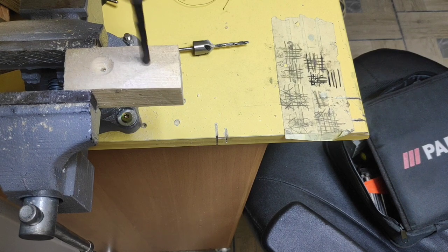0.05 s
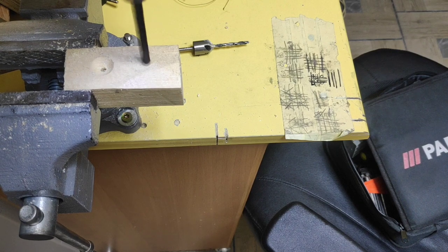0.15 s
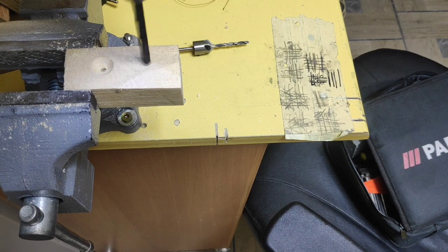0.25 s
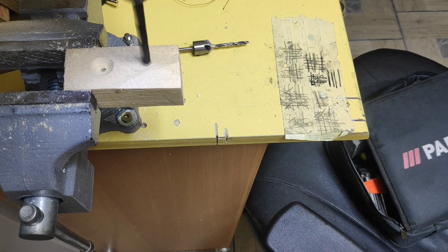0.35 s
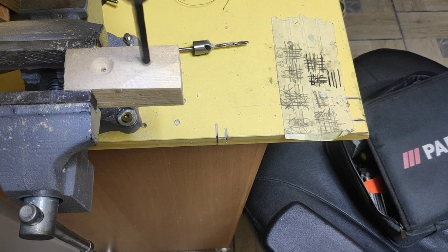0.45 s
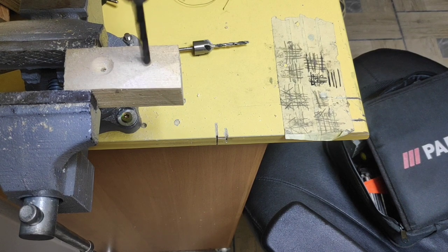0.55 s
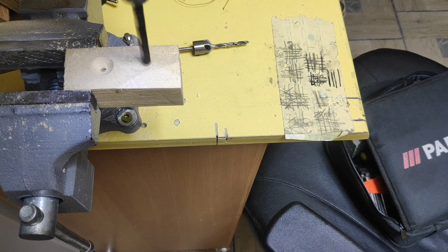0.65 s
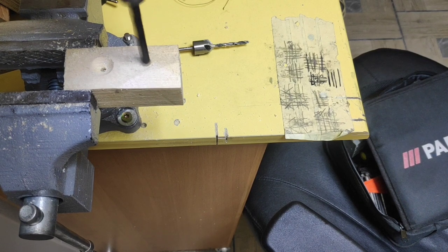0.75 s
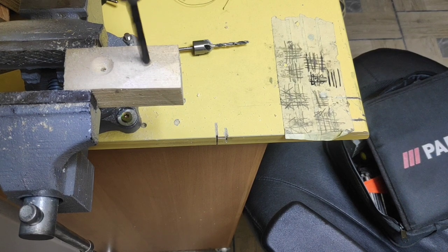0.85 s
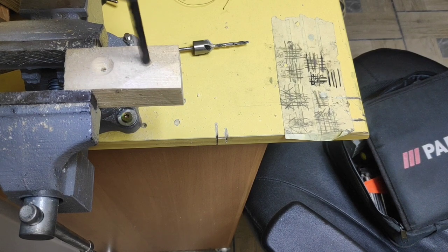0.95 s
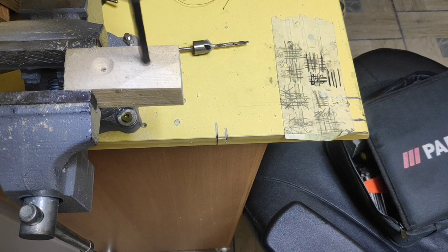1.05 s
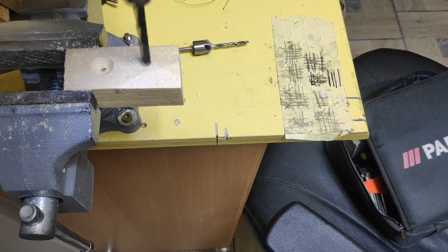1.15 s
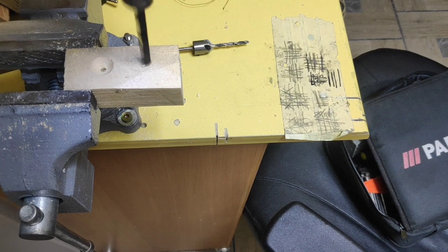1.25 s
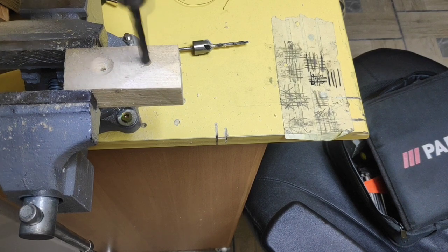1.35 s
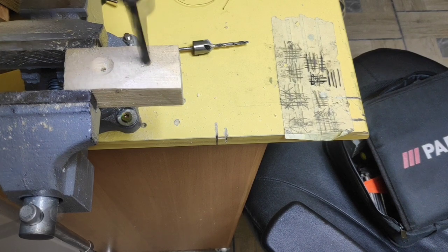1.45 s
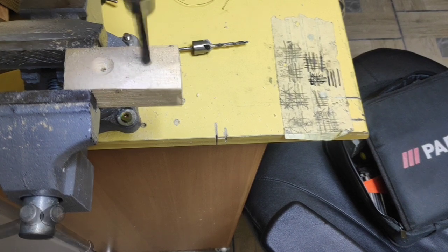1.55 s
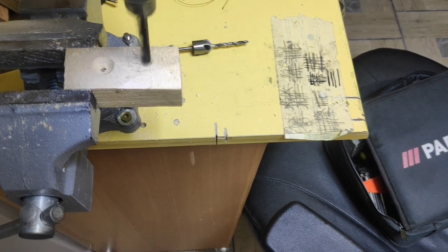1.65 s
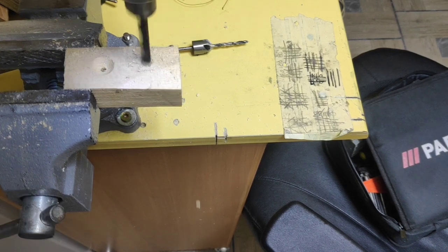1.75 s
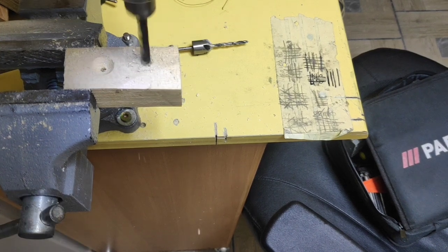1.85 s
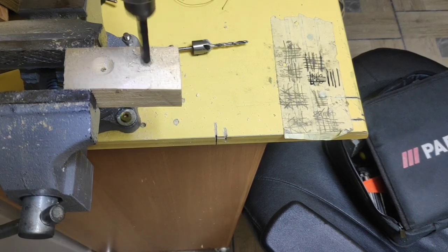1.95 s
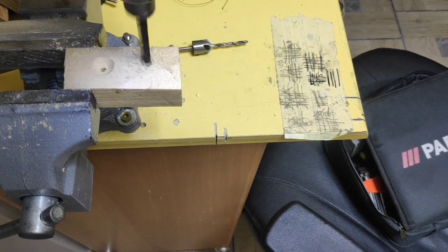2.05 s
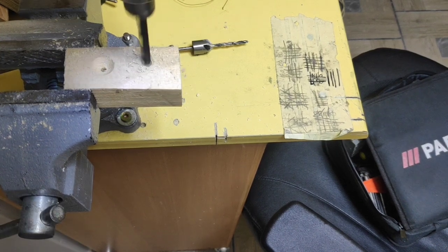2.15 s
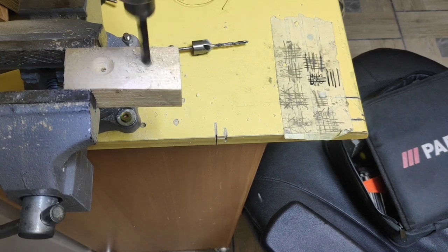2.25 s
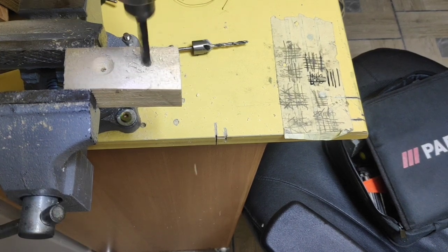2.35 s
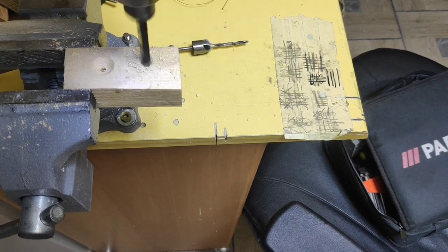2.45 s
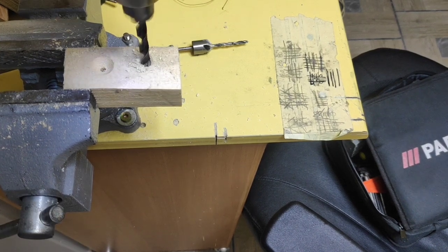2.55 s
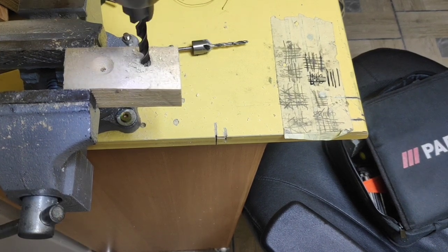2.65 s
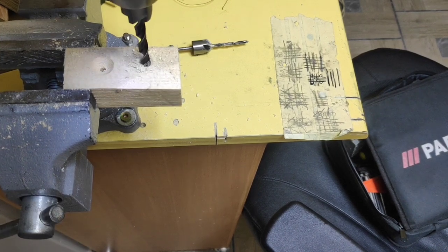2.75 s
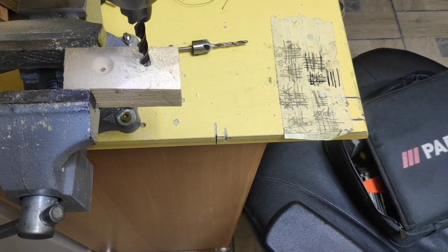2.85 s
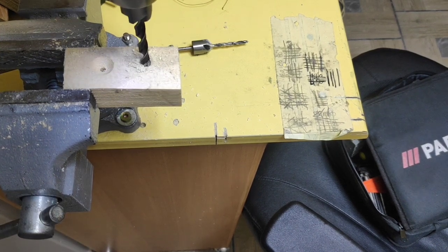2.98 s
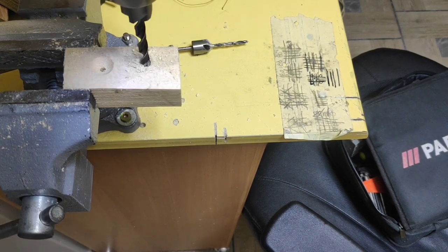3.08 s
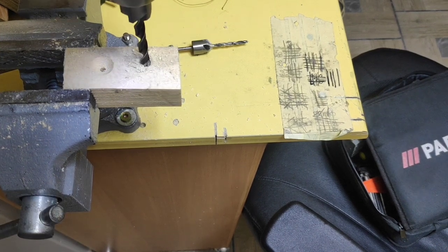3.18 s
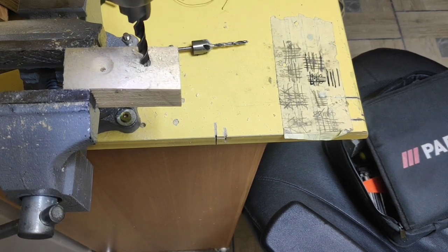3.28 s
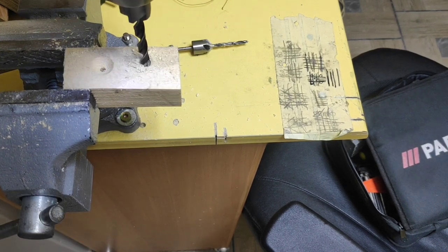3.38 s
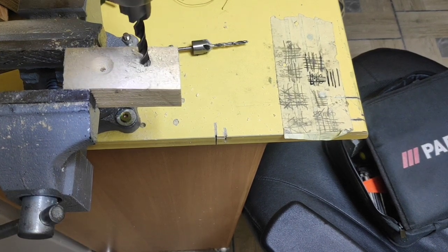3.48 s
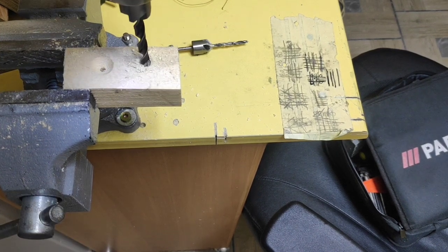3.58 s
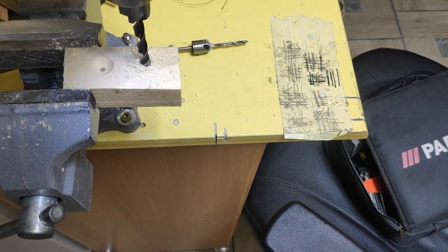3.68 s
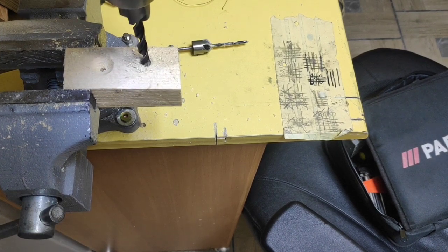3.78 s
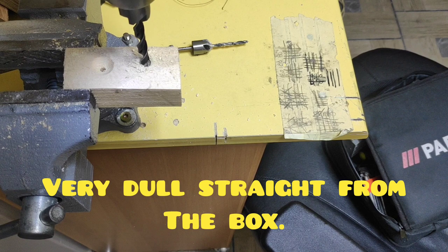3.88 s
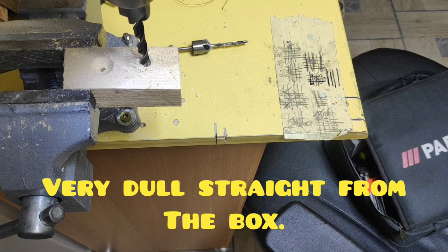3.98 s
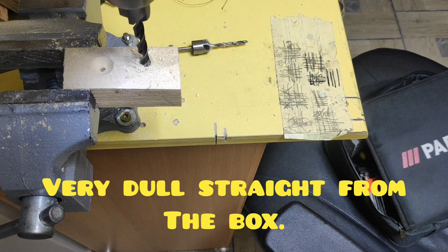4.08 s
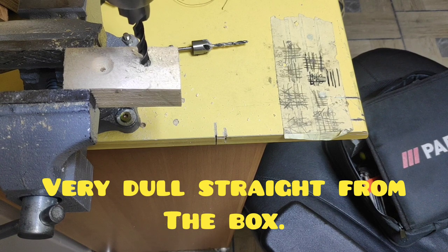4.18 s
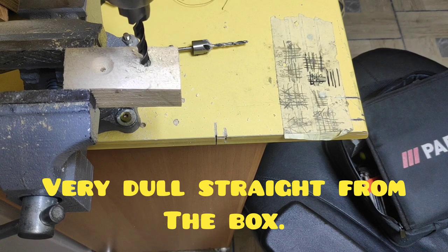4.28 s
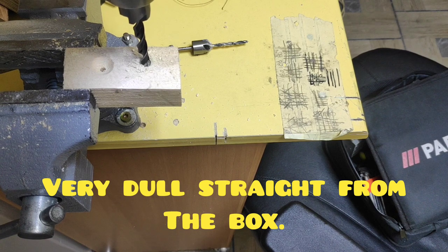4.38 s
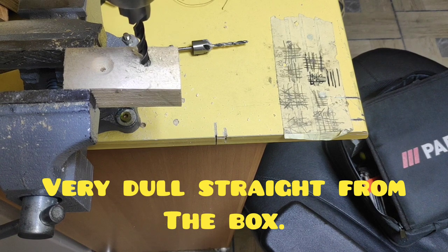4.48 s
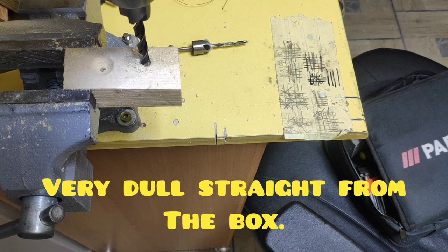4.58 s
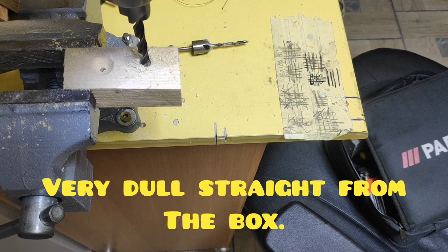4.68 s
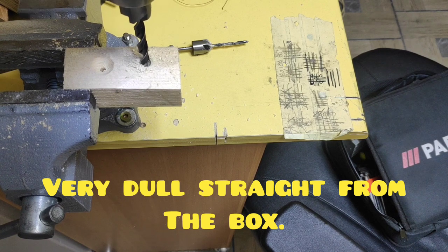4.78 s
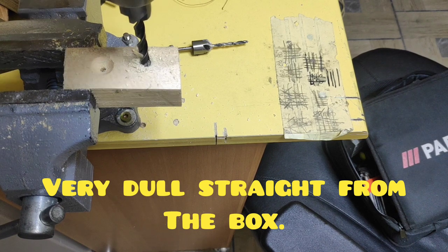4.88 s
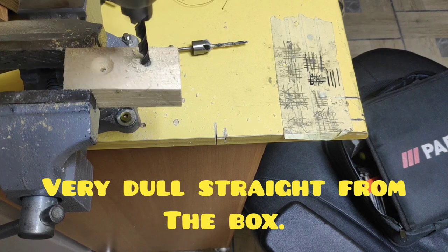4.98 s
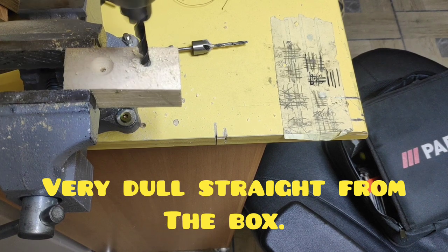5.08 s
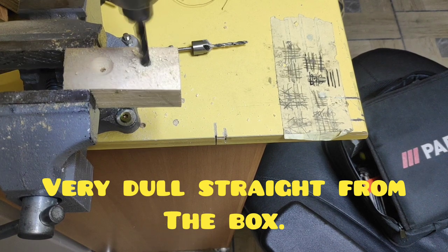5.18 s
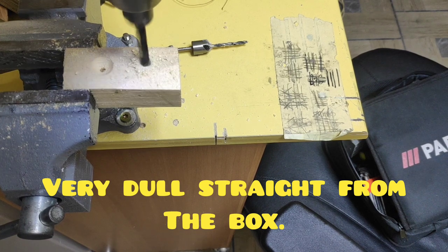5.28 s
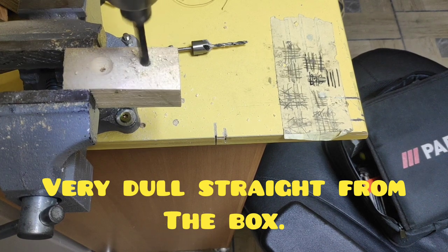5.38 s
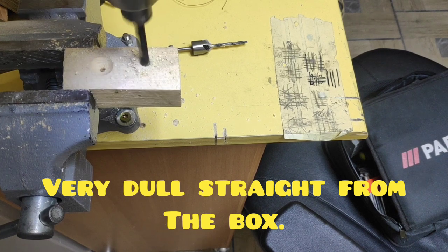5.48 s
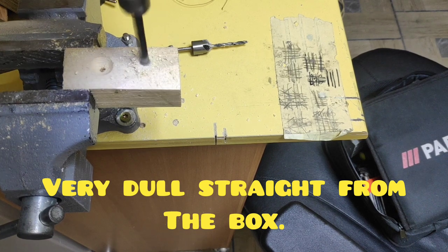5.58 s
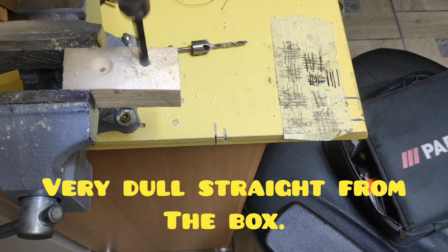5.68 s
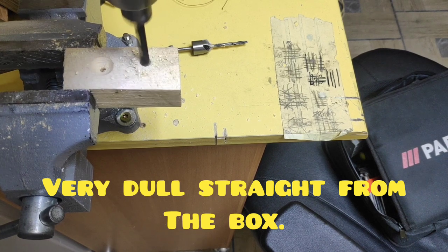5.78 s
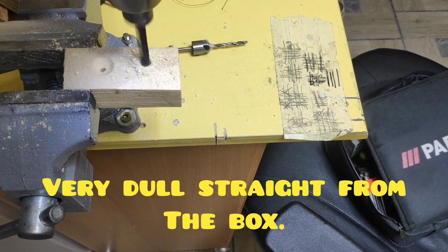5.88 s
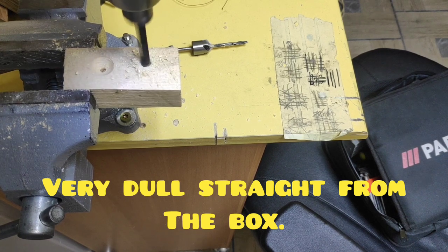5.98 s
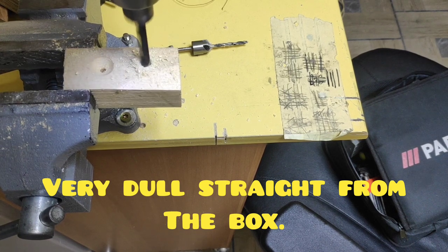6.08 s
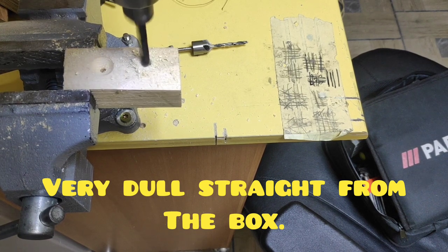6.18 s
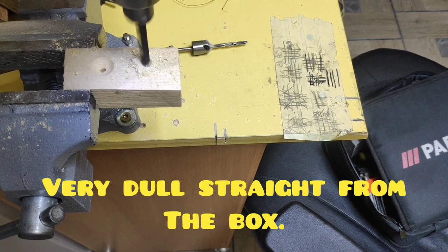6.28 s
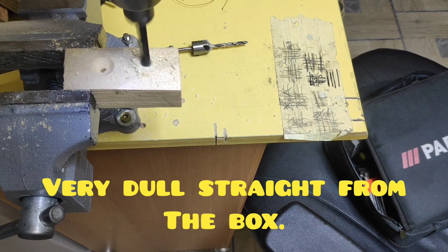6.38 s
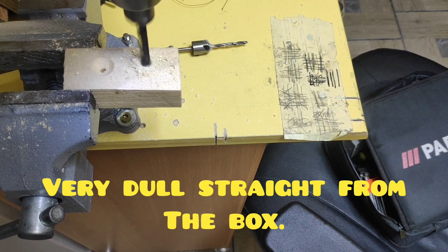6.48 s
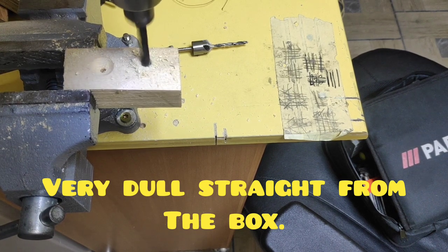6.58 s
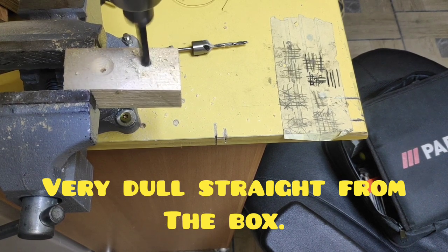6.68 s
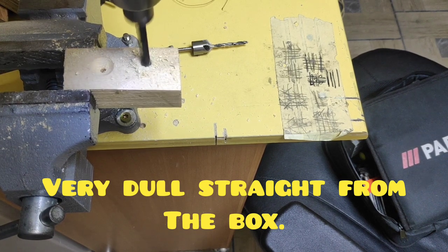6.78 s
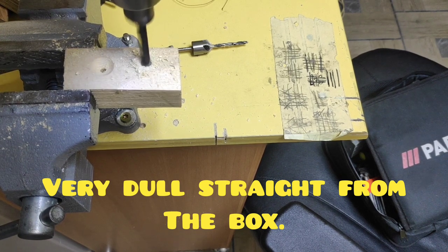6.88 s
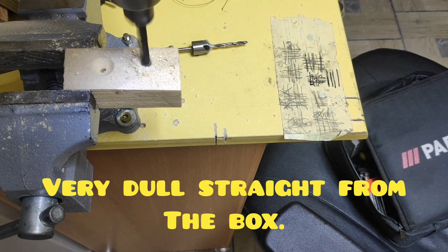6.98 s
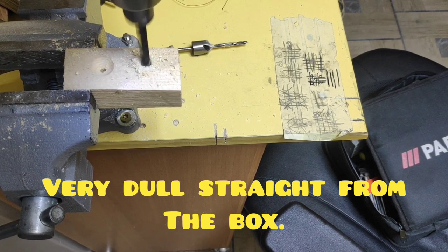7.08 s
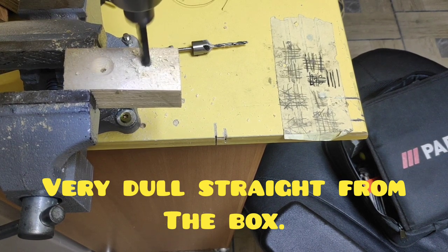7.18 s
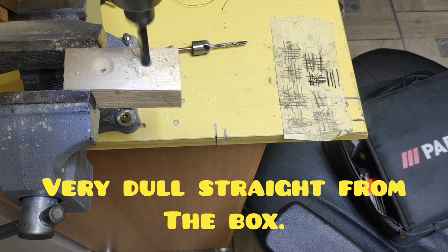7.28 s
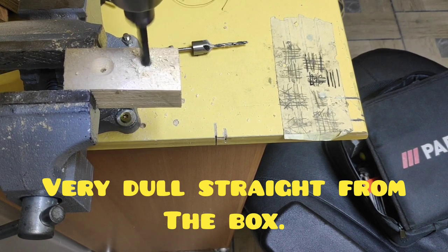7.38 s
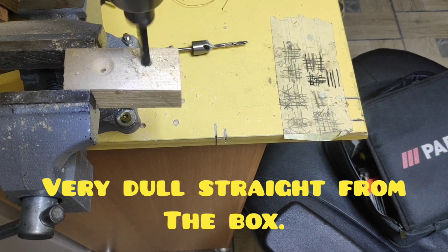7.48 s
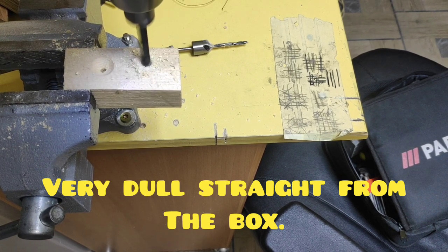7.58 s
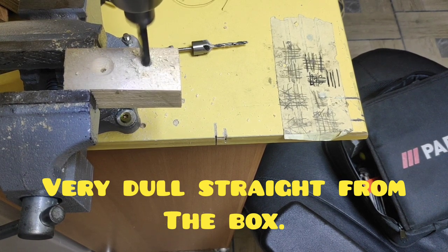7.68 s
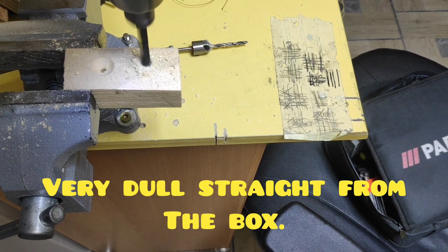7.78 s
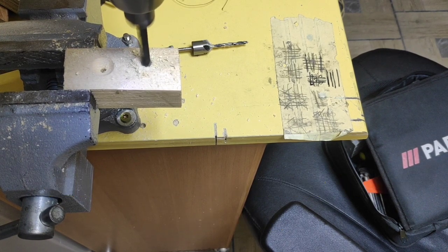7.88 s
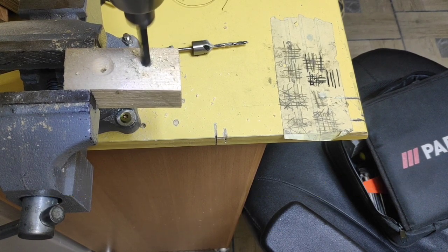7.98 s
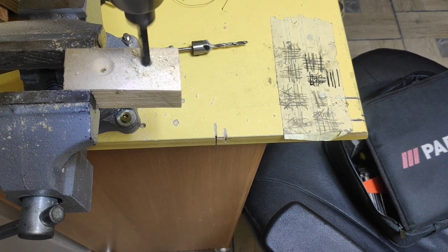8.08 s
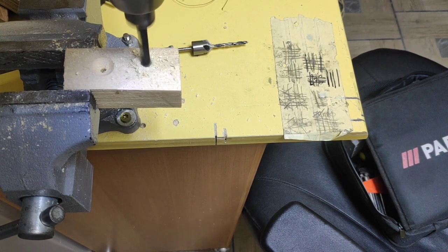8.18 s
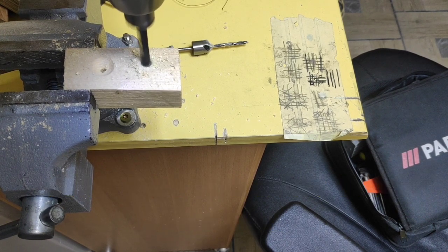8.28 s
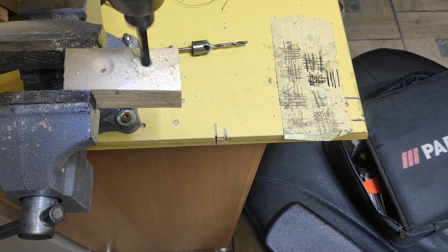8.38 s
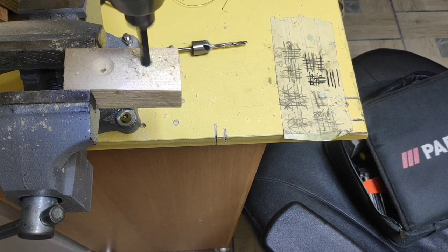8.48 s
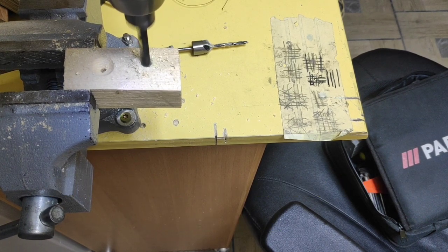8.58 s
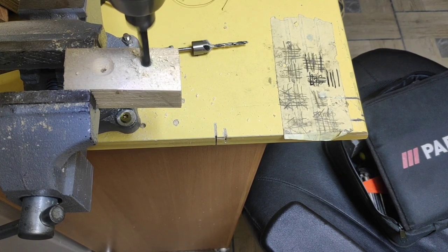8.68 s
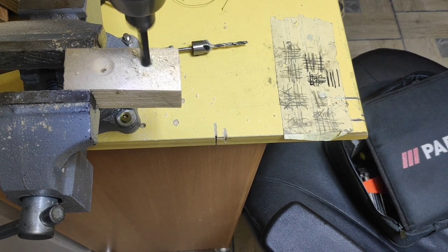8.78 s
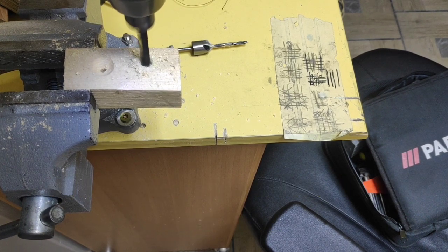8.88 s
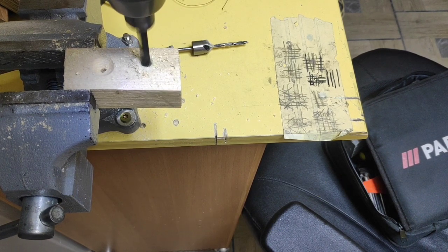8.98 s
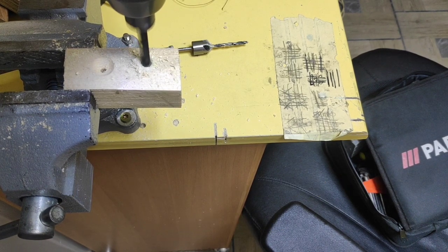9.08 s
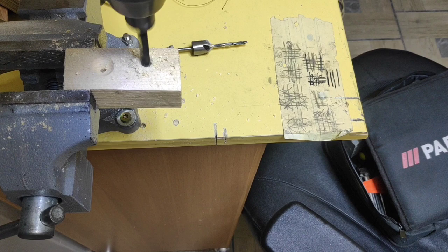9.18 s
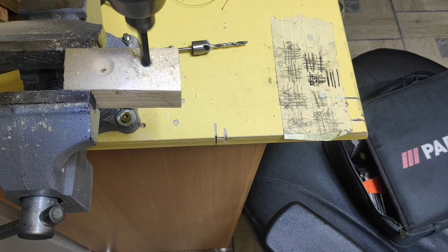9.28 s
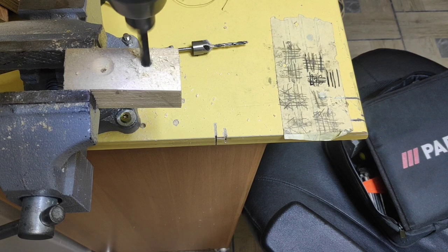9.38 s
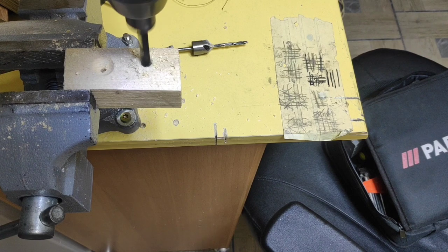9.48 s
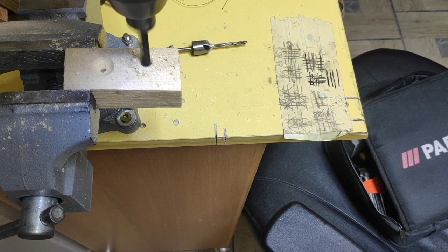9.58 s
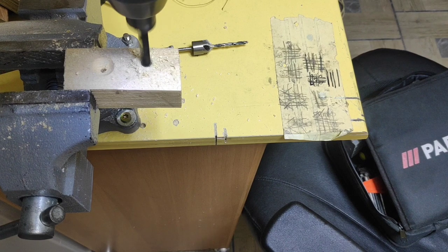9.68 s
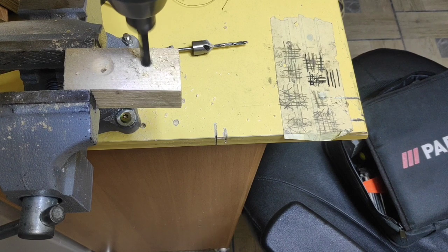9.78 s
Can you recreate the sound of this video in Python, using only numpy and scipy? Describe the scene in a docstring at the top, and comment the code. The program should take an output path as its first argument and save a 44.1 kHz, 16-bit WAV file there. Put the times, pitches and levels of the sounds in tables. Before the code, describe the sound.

Stereo, close drill sound with a short diffuse room behind it. A high-pitched electric motor and gritty gears start at once, blend into a slower run, then drop off quickly in a chattering metallic clack. Small clicks and faint rubbing follow over low room hum. Drilling then fades up already at speed, rises, sags under load and drones steadily, with a thin squeak late on and low bench rumble beneath.

```python
"""A small workshop, two microphones: a cordless drill bores into a wooden block held in a vice, in three runs.
The first spins up, its motor and gear tones whining over a dense gear rattle, and fades into a slower second.
When the trigger is let go the motor slows and the spindle brake clunks; light ticks, bumps and rubs follow.
The third run swells in, already at speed; its pitch and drone move with the load, and a faint squeak comes late.
Tones follow the motor's turns and swell in the drill's resonances; noise makes the rattle, room air and touches."""
import sys
import numpy as np
from scipy import signal
from scipy.fft import rfft, irfft, next_fast_len
from scipy.io import wavfile
from scipy.ndimage import uniform_filter1d

SR = 44100
rng = np.random.default_rng(int(sys.argv[2]) if len(sys.argv) > 2 else 0)


def to_wav(s):
    """Save 16-bit WAV."""
    ch = np.atleast_2d(s).T  # columns
    pcm = np.round(np.clip(ch, -1, 1) * 32767)  # PCM
    wavfile.write(sys.argv[1], SR, pcm.astype(np.int16))


N = 433944
TIME = np.arange(N) / SR

# motor speed under the changing load, one curve a run: (time [s], speed [turns per s])
FIRST_RUN_SPEED = [(.2, 403.5), (.67, 401.5), (.94, 403.5), (1.24, 397.5), (1.43, 401.5), (1.9, 398)]
SECOND_RUN_SPEED = [(1.3, 378), (1.6, 379.5), (1.78, 376), (2.0, 381.5), (2.14, 383.4), (2.4, 382.3),
                    (2.5, 388)]
THIRD_RUN_SPEED = [(4.6, 384), (5.15, 386), (5.27, 401), (5.5, 407.5), (5.73, 410), (5.96, 401),
                   (6.22, 394), (6.39, 386), (6.7, 391.7), (6.94, 391.4), (7.05, 389.2), (8.16, 387.3),
                   (8.27, 376.5), (8.55, 382), (8.68, 375.5), (8.92, 376.5), (9.2, 382.5), (9.48, 377.5),
                   (9.8, 381)]
FULL_SPEED = 397.6   # reference speed, turns per s
# the motor starts at this share of its speed and closes the gap with this time constant
START_SHARE, SPIN_UP_S = .27, .04
# the trigger is let go, the motor slows ever faster over this long, and the brake cuts the sound
RELEASE_S, BRAKING_S, BRAKE_S = 2.525, .125, 2.602
FIRST_RUN_DB, SECOND_RUN_DB = 0.86, .5   # levels relative to the third run
DISSOLVE_FROM_S, DISSOLVE_S = 1, 1.015   # the first run fades out as the second fades in
RESTART_S, SWELL_S, SWELL_POWER = 4.597, 1.11, 0.87   # the third run swells in almost linearly

# tones of the rotating parts: (part, cycles per motor turn, level away from resonances [dB],
# left-right [dB], roughness [0-1])
TONES = [("shaft", 1, -44, -1, 0.11), ("shaft", 2, -46.5, -2, .4), ("poles", 4, -33.5, -6.5, 0.46),
         ("commutator", 8, -27, -7.5, .31), ("rotor", 10, -35, -6, 0.74), ("pinion", 13, -36, -5.5, 0.51),
         ("fan", 15, -35, -5, 0.5), ("mesh", 56 / 3, -42.5, -8.5, 0.67), ("whistle", 28, -36.5, 9, 0.41),
         ("shudder", 13 / 32, -47, 0, 0.35), ("squeak", 6.55, -35, 0, 1), ("teeth", 19 / 3, -39, 0, 1),
         ("teeth", 20 / 3, -33, 0, 1), ("teeth", 26 / 3, -36.5, -1, 1), ("teeth", 28 / 3, -31, .75, 0.71),
         ("teeth", 52 / 3, -28, -8.5, 0.53)]
# resonances of the drill: (centre [Hz], half width where the boost falls to 1/e [Hz], boost [dB])
RESONANCES = [(413.6, 33.4, 8.5), (1180, 150, 8), (3130, 220, 7.5), (3854, 22, 6.5), (4020, 87, 5),
              (4600, 290, 7), (5260, 250, 9.5), (5800, 70, 5.5), (7080, 270, 19.5), (11260, 73, 10.5)]
# added level of the commutator's whine: (time [s], level [dB])
COMMUTATOR = [(.055, -16), (.1, 1), (.45, -3), (.63, -1), (.8, -2.5), (1.8, -3.5), (2.05, -1.5),
              (2.52, -4.5), (2.56, -12.5), (4.6, -7.5), (5.1, -4.5), (5.22, -1), (5.38, -8), (5.53, 2.5),
              (5.88, -4), (6.2, 1), (6.42, -4), (6.6, 0.5), (8.2, -3), (8.62, -6.5), (8.74, -2),
              (9.3, -6.5), (9.4, -6.5), (9.65, -7.5)]
# added level of the lower tone of the poles: (time [s], level [dB])
POLES = [(0, -10), (.04, 8), (.08, -4), (.3, -0.5), (1.1, -1), (1.5, -11), (2.54, -9), (2.57, 9),
         (2.587, 15.5), (2.605, -13), (4.6, 3), (5.1, 0), (5.55, 3), (5.75, -3), (6.3, 4), (6.42, 0),
         (6.65, 4.5), (6.93, 8.5), (7.15, -1), (7.35, 4.5), (7.6, -4), (8.0, 4), (8.25, -1.5), (9.8, -5)]
# added level of the low shudder of the bit in its hole: (time [s], level [dB])
SHUDDER = [(.15, -17), (.45, 1), (.75, -4), (2.5, -4.5), (5.75, -11), (5.95, 4), (6.12, 5), (6.24, -7),
           (6.65, 5), (6.95, -1), (7.12, -7), (7.3, 3), (7.9, -5.5), (9.8, -3)]
# added level of a faint squeak of the bit, once it is deep in the hole: (time [s], level [dB])
SQUEAK = [(8.25, -18), (8.4, 8), (9.8, 2.5)]
# added level of the pinion's tone, strongest while the motor gathers speed: (time [s], level [dB])
PINION = [(.03, 11.5), (.07, 9), (.12, 7), (.2, -0.5), (8.1, -1), (8.4, -6)]
SINGING = {"commutator": COMMUTATOR, "pinion": PINION, "poles": POLES, "shudder": SHUDDER, "squeak": SQUEAK}
TONE_FOLLOWS = 1.14   # all tones but the shaft's swing further in dB than the rattle
TEETH_FOLLOW = .25    # side tones of the teeth grow with load: share of the pressure's swing in dB
BREAK_UP = 1.5        # the weakening commutator whine breaks up: dB of roughness gained per dB lost

# how hard the bit bears down on the block: (time [s], level [dB])
BEARING = [(0, -14), (1.4, -18), (2.1, -9), (4.6, -1.5), (9.84, -1.5)]
# colours of the rattle through housing, gearbox and block, and of its hiss:
# (frequency [Hz], relative level per Hz [dB])
HOUSING = [(60, -32.5), (165, -7.5), (280, -16), (480, -10), (760, -4.5), (1130, 2.5), (1850, -3.5),
           (2500, -2), (2850, -7.5), (3600, -20)]
GEARBOX = [(2400, -47.5), (2950, -10.5), (3450, -8), (4050, -1.5), (4800, -4.5), (6200, -1), (7200, -0.5),
           (7800, -2.5), (8300, -6), (9400, -7.5), (11000, -33)]
BLOCK = [(450, -32), (620, -7.5), (790, 1.5), (900, 1), (1080, -13.5), (1500, -31.5)]
HISS = [(7500, -25.5), (9300, -6.5), (10300, 5), (11200, 7), (12500, 3.5), (13600, 5), (14300, -12),
        (14700, -35)]
# steel ring of the chuck: (frequency [Hz], relative level per Hz [dB])
CHUCK = [(6000, -38.5), (6750, -9.5), (7100, 1.5), (7400, -11.5), (8200, -42)]
# the bit's flutes scrape in the hole: (frequency [Hz], relative level per Hz [dB])
SCRAPE = [(6000, -32), (7600, 6.5), (8700, 3), (10000, 0.5), (11000, -26)]
# balance of the rattle's paths, before drone, mesh and pressure act on them
GEARBOX_DB, HISS_DB, HOUSING_DB = -18.5, -21, -30
BLOCK_DB, CHUCK_DB, SCRAPE_DB = -32.5, -42.5, -22
DRONE_DB_PER_HZ = 0.1254   # housing and block drone more as the motor runs faster
# the rattle drops briefly: (time [s], length either side [s], level [dB])
LULLS = [(1.206, 0.0095, -7), (2.536, 0.0052, -3.5)]

# blows of the brake: (time [s], level [dB])
CLACKS = [(2.540, -24), (2.575, -21), (2.58, -6.5), (2.585, -8.5), (2.605, -19)]
# broad resonances that each blow rings: (centre [Hz], added level [dB], burst decay t60 [s])
CLACK_MODES = [(1180, -8.5, 0.03), (2500, -5.5, 0.02), (3850, -9.5, .02), (6050, -2.5, 0.025)]
# light ticks: (time [s], peak level [dB], centre [Hz], burst decay t60 [s])
TICKS = [(2.8765, -29, 3700, 0.014), (2.886, -46, 6000, .012), (3.2085, -25, 7000, 0.014),
         (3.2105, -28, 5160, 0.027), (3.388, -41, 6000, .01), (3.3905, -30.5, 3500, 0.014),
         (3.402, -45, 3400, .14)]
# dull bumps of the bench: (time [s], starting level [dB], frequency [Hz], decay t60 [s])
BUMPS = [(2.825, -47, 125, 0.073), (2.882, -42, 110, 0.052), (3.703, -52, 121, .07),
         (5.7705, -28, 105, .07), (5.79, -35, 126, .12), (5.828, -42, 125, .1)]
# handling rubs: (time [s], length either side [s], level [dB])
RUBS = [(3.066, 0.017, -54), (3.864, .011, -47), (3.902, 0.016, -43), (4.365, 0.033, -55),
        (4.445, 0.045, -51.5)]
# colour of the rubs: (frequency [Hz], relative level per Hz [dB])
RUB = [(1470, -47), (2500, -17), (4580, -9), (5070, -8), (7010, -2), (10100, -11), (14000, -8.5)]

# colour of the bench's rumble: (frequency [Hz], relative level per Hz [dB])
RUMBLE = [(15, -8.5), (40, 5.5), (70, -6), (110, -8.5), (230, -4), (400, -43.5)]
BENCH_DB, BENCH_FOLLOWS = -50, 0.59   # level at 0 dB pressure; share of the pressure's swing in dB
# the drill at the two microphones: (frequency [Hz], left-right [dB], likeness [0-1], left lag [radians])
MICS = [(40, 0.5, 0.2, 0.5), (150, -1, 0.9, 0.34), (428.5, 3, 0.77, 0.2), (776, -4.5, 0.5, 1),
        (1210, -1.5, 0.63, 1.33), (1960, -2, 0.6, 3.02), (2700, -0.5, 1, 2.77), (3960, -1, .45, 5.64),
        (4700, -2.5, 0.7, 6.1), (5680, -6, 0.15, 7.14), (7200, -4, 0.38, 6.95), (8640, -1, 0.29, 8.8),
        (10390, 7.5, 0.13, 6.7), (13500, 9, 0.05, 7.9)]
# workshop reverberation: (frequency [Hz], decay t60 [s])
ROOM_T60 = [(150, 0.32), (1100, 0.58), (4000, 0.5), (8000, 0.38), (14000, 0.39)]
# colour of the room's steady air: (frequency [Hz], relative level per Hz [dB])
FLOOR = [(25, 1), (50, 4.5), (100, -0.5), (580, -5), (810, -3.5), (1400, -13), (2250, -2), (2450, -13.5),
         (4900, -15), (5850, -7.5), (7000, -16), (10300, -17), (13000, -13.5)]
FLOOR_DB = -57.5
# faint mains hum in the room: (frequency [Hz], rms level [dB])
HUM = [(100, -82), (200, -74), (300, -76.5)]
CUTOFF_HZ = 14400


def from_db(db):
    """Decibels to gain."""
    return np.exp(np.asarray(db) * (np.log(10) / 20))


def rms_one(x):
    """Scale to an rms of 1."""
    return x / np.sqrt(np.mean(np.abs(x) ** 2) + 1e-20)


def in_time(rows):
    """The columns of a curve, sample by sample."""
    s, *columns = np.transpose(rows)
    return [np.interp(TIME, s, column) for column in columns]


def at_hz(rows, hz):
    """The columns of a spectrum, read on a log-frequency axis."""
    points, *columns = np.transpose(rows)
    log_hz = np.log(hz + 1)
    return [np.interp(log_hz, np.log(points), column) for column in columns]


def band_pass(order, edges, x):
    """Keep what lies between two edges in Hz."""
    return signal.sosfilt(signal.butter(order, edges, "band", fs=SR, output="sos"), x)


def drift(corner_hz):
    """Slow chance of spread 1: noise through two equal low-pass poles, drawn at every 16th sample."""
    pole = np.exp(-2 * np.pi * corner_hz * 16 / SR)
    noise = rng.standard_normal(N // 16 + 4002)
    slow = signal.lfilter([1], [1, -2 * pole, pole * pole], noise)[4000:]   # past the filter's start
    return np.interp(np.arange(N) / 16, np.arange(len(slow)), rms_one(slow))


def stereo_noise(spectrum, strength=1, aimed=1):
    """Coloured noise of rms 1, partly shared by both microphones; aimed=1 places it at the drill."""
    size = next_fast_len(N, True)
    hz = np.arange(size // 2 + 1) * SR / size
    excitation = rng.standard_normal((3, N), dtype=np.float32) * np.float32(strength)
    shared, left, right = rfft(excitation, size)
    pan_db, alike, lag = np.float32(at_hz(MICS, hz))
    alike = np.clip(alike, 0, 1)
    common, own = np.sqrt(alike) * shared, np.sqrt(1 - alike)
    left = (common * np.exp(-1j * lag * aimed) + own * left) * from_db(aimed * pan_db / 2)
    right = (common + own * right) * from_db(-aimed * pan_db / 2)
    colour = np.float32(from_db(at_hz(spectrum, hz)[0]))
    return rms_one(irfft(np.complex64([left, right]) * colour, size)[:, :N])


def running(brake_db_per_s=600, unsteady=0.001):
    """Speed and gain of each run: spin-up and fade into the second, braking, then the third's swell."""
    speeds = (FIRST_RUN_SPEED, SECOND_RUN_SPEED, THIRD_RUN_SPEED)
    first, second, third = (in_time(curve)[0] for curve in speeds)
    waver = 1 + unsteady * drift(14.2)
    spin_up = 1 - (1 - START_SHARE) * np.exp(-TIME / SPIN_UP_S)
    braking = 1 - np.clip((TIME - RELEASE_S) / BRAKING_S, 0, 1) ** 2
    dissolve = np.clip((TIME - DISSOLVE_FROM_S) / DISSOLVE_S, 0, 1)
    locked = from_db(-brake_db_per_s * np.clip(TIME - BRAKE_S, 0, 1))
    swell = np.clip((TIME - RESTART_S) / SWELL_S, 0, 1) ** SWELL_POWER
    smooth_swell = np.abs(uniform_filter1d(swell, size=SR // 35))
    return [(first * waver * spin_up, from_db(FIRST_RUN_DB) * (1 - dissolve)),
            (second * waver * braking, from_db(SECOND_RUN_DB) * dissolve * locked),
            (third * waver, smooth_swell)]


def resonance_db(hz):
    """The boost that the drill's body gives to a tone of this pitch."""
    grid = np.linspace(0, SR / 2, 4096)
    boost = sum(db * np.exp(-((grid - centre) / width) ** 2) for centre, width, db in RESONANCES)
    return np.interp(hz, grid, boost)


def whine(runs, blur_hz=27, chatter_hz=150, slack=1.6, slow_loss_db=14):
    """Tones locked to the motor shaft; play in the bearings blurs each into a narrow band."""
    out = np.zeros((2, N))
    blur = rms_one(drift(blur_hz) + 1j * drift(blur_hz))
    chatter = rms_one(drift(chatter_hz) + 1j * drift(chatter_hz))
    bearing_db = in_time(BEARING)[0]
    for speed, gain in runs:
        heard, = np.nonzero(gain > 1e-3)
        span = slice(heard[0], heard[-1] + 1)
        speed, gain = speed[span], gain[span]
        turns, tone_gain = np.cumsum(speed) / SR, gain ** TONE_FOLLOWS
        # below full speed the gears chatter and the tones weaken, most in spin-up and braking
        slowness = np.maximum(1 - speed / FULL_SPEED, 0)
        loose = np.clip(slack * slowness, 0, 1)
        firm = np.sqrt(1 - loose ** 2)
        for part, per_turn, db, pan_db, rough in TONES:
            if part == "teeth":
                db = db + TEETH_FOLLOW * bearing_db[span]
            else:
                db = db + resonance_db(per_turn * speed)
            if part in SINGING:
                singing_db = np.interp(TIME[span], *np.transpose(SINGING[part]))
                db = db + singing_db
                if part == "commutator":
                    rough = rough * from_db(-BREAK_UP * singing_db)
            rough = np.clip(rough, 0, 1)
            # each tone reads the shared blur from a place of its own
            wobble = np.sqrt(1 - rough ** 2) + rough * np.roll(blur, rng.integers(N))[span]
            if part == "shaft":
                wobble = gain * wobble
            else:
                own_chatter = np.roll(chatter, rng.integers(N))[span]
                wobble = tone_gain * (firm * wobble + loose * own_chatter)
            level = from_db(db - slow_loss_db * slowness)
            tone = level * wobble * np.exp(2j * np.pi * per_turn * turns)
            lag = at_hz(MICS, per_turn * FULL_SPEED)[2]
            microphones = np.array([[from_db(pan_db) * np.exp(-1j * lag)], [1]])
            out[:, span] += np.real(rms_one(microphones) * tone)
    return out


def tooth_impacts(turns, flutter_db=0.84, grain_db=1.0, once_a_turn=.12):
    """Gear teeth hit unevenly: a slow flutter, a fine grain and a beat on each motor turn."""
    chance_db = flutter_db * drift(35) + grain_db * drift(700)
    return from_db(chance_db) * (1 + once_a_turn * np.cos(2 * np.pi * turns))


def rattle(turns, drone_db, mesh_db, chip_db=1.0):
    """Impacts sound through the drill and block; the bit scrapes; a hard mesh sets the chuck ringing."""
    impacts = tooth_impacts(turns)
    cutting = from_db(in_time(BEARING)[0] + chip_db * drift(45))
    gearbox = from_db(GEARBOX_DB) * stereo_noise(GEARBOX, impacts)
    housing = from_db(HOUSING_DB + drone_db) * stereo_noise(HOUSING, impacts)
    block = from_db(BLOCK_DB + drone_db) * cutting * stereo_noise(BLOCK, impacts)
    scrape = from_db(SCRAPE_DB) * cutting * stereo_noise(SCRAPE, impacts)
    hiss = from_db(HISS_DB) * stereo_noise(HISS, impacts)
    chuck = from_db(CHUCK_DB + mesh_db) * stereo_noise(CHUCK, impacts)
    return gearbox + housing + block + scrape + hiss + chuck


def gear_rattle(runs, gain, least_drone_db=-5):
    """The rattle of all runs; their speeds, weighted by power, set its colour."""
    shares = [(speed, (run_gain / gain) ** 2) for speed, run_gain in runs]
    heard_speed = sum(share * speed for speed, share in shares)
    mesh_per_turn = next(per_turn for part, per_turn, *_ in TONES if part == "mesh")
    # the chuck rings with the mesh tone, so it swings as far as the tones do
    mesh_db = sum(share * resonance_db(mesh_per_turn * speed) for speed, share in shares)
    mesh_db = mesh_db + (TONE_FOLLOWS - 1) * 20 * np.log10(gain)
    drone_db = np.maximum(DRONE_DB_PER_HZ * (heard_speed - FULL_SPEED), least_drone_db)
    return gain * rattle(np.cumsum(heard_speed) / SR, drone_db, mesh_db)


def touches(rows, width_octaves, apart, snap=0):
    """Short contacts: a burst that dies away inside one broad resonance, with an optional first snap."""
    out, age = np.zeros((2, N)), TIME[:SR // 3]
    for s, db, hz, t60 in rows:
        edges = np.clip(hz * 2 ** (np.array([-.5, .5]) * width_octaves), 20, SR / 2.2)
        shared = rng.standard_normal(len(age))
        force = shared + apart * rng.standard_normal((2, len(age))) + snap * (age == 0)
        burst = band_pass(1, edges, force * from_db(-60 * age / t60))
        start = int(s * SR)
        out[:, start:start + len(age)] += from_db(db) * burst / np.abs(burst).max()
    return out


def brake():
    """The spindle lock chatters shut; each blow is a noisy clunk in a few broad resonances."""
    blows = [(s, db + mode_db, hz, t60) for s, db in CLACKS for hz, mode_db, t60 in CLACK_MODES]
    return touches(blows, width_octaves=0.21, apart=1.0)


def bumps():
    """Dull knocks set the bench swinging: decaying low sines."""
    out, age = np.zeros(N), TIME[:SR // 3]
    for s, db, hz, t60 in BUMPS:
        start = int(s * SR)
        out[start:start + len(age)] += from_db(db - 60 * age / t60) * np.sin(2 * np.pi * hz * age)
    return out


def rubs(grain_db=2.0):
    """Soft grainy swishes as the grip on the drill shifts."""
    swell = sum(from_db(db) * np.exp(-((TIME - s) / length) ** 2) for s, length, db in RUBS)
    return swell * stereo_noise(RUB, from_db(grain_db * drift(300)), aimed=0)


def bench(gain, lumpy_db=3.0):
    """Uneven cutting forces shake vice and bench, the more the harder the bit bears down."""
    level_db = BENCH_DB + BENCH_FOLLOWS * in_time(BEARING)[0] + lumpy_db * drift(13)
    return gain * from_db(level_db) * stereo_noise(RUMBLE)


def workshop(x, first_echo_s=0.0033):
    """Diffuse reverberation: bands of noise, each decaying at its own rate."""
    age, tail = TIME[:SR // 2], 0
    edges = np.geomspace(100, 16000, 9)
    for low, high in zip(edges, edges[1:]):
        band = band_pass(2, [low, high], rng.standard_normal((2, len(age))))
        t60 = at_hz(ROOM_T60, np.sqrt(low * high))[0]
        tail = tail + band * from_db(-60 * age / t60)
    tail = tail * (age > first_echo_s) * np.sqrt(2 / np.sum(tail ** 2))
    # the bass stays close and dry
    bright = signal.sosfilt(signal.butter(2, 600, "high", fs=SR, output="sos"), x)
    return signal.fftconvolve(bright, tail, axes=1)[:, :N]


def background():
    """The nearly steady air of the workshop as noise, and its mains hum as sines."""
    hum = sum(from_db(db) * np.sqrt(2) * np.sin(2 * np.pi * hz * TIME) for hz, db in HUM)
    return hum + from_db(FLOOR_DB + .6 * drift(4)) * stereo_noise(FLOOR, aimed=0)


def scene(room_db=-4.5, handling_room_db=-6.0):
    """Drill and handling in the workshop, over its quiet background."""
    runs = running()
    gain = np.sqrt(sum(run_gain ** 2 for _, run_gain in runs)) + 1e-9
    tones = whine(runs)
    lull_db = sum(db * np.exp(-((TIME - s) / length) ** 2) for s, length, db in LULLS)
    clatter = from_db(-1.31 + lull_db) * gear_rattle(runs, gain) + brake()
    handling = touches(TICKS, width_octaves=0.66, apart=0.84, snap=5.7) + bumps() + rubs()
    # the whine and the handling are heard closer and drier than the clatter
    drill_send = from_db(room_db) * (clatter + tones / 3)
    room = workshop(drill_send + from_db(handling_room_db) * handling)
    return clatter + tones + handling + room + bench(gain) + background()


def record(dry, ceiling=.88):
    """The highest peaks are rounded off and the top is cut steeply."""
    rounded = dry / (1 + (dry / ceiling) ** 8) ** (1 / 8)
    return signal.sosfilt(signal.ellip(12, .1, 80, CUTOFF_HZ, fs=SR, output="sos"), rounded)


dry = scene()
out = record(dry)
to_wav(out)
```